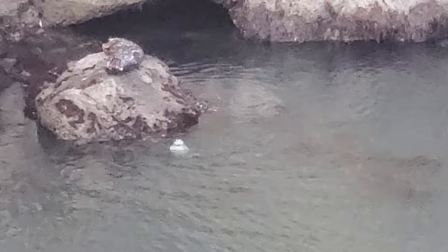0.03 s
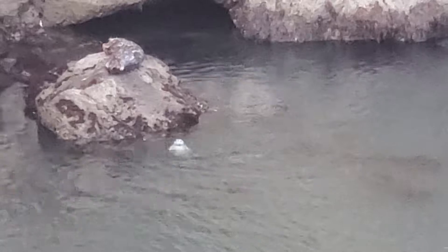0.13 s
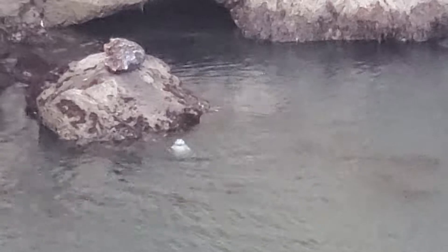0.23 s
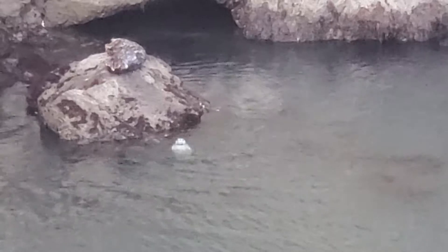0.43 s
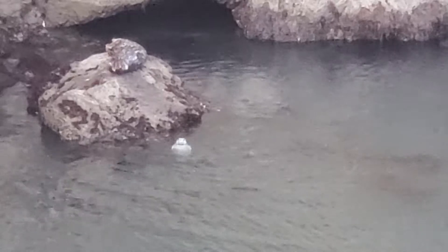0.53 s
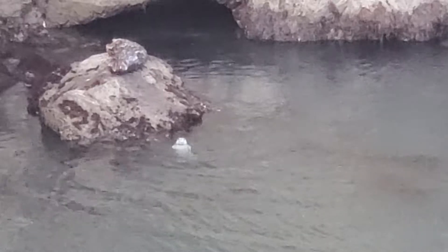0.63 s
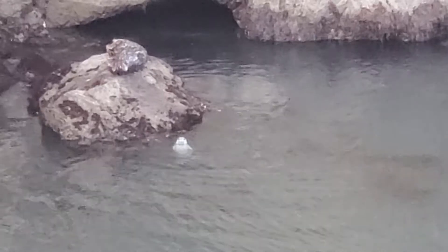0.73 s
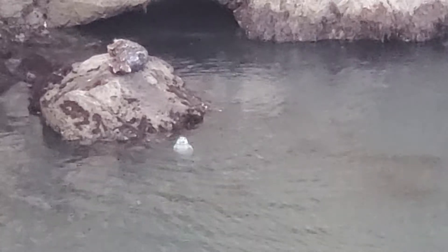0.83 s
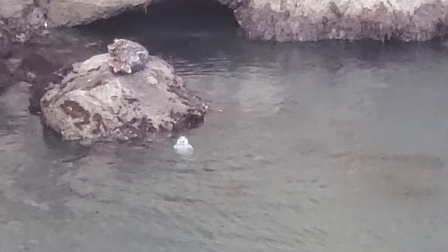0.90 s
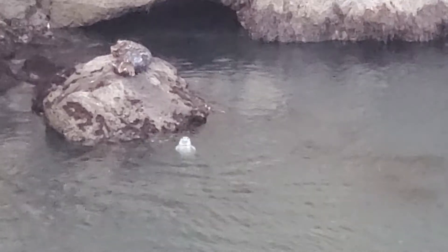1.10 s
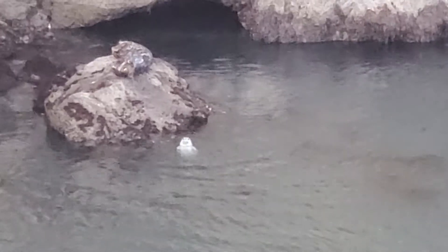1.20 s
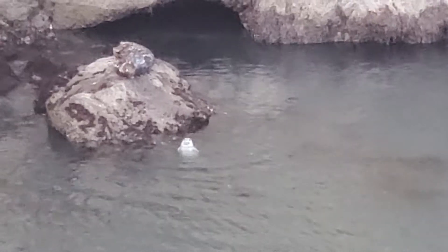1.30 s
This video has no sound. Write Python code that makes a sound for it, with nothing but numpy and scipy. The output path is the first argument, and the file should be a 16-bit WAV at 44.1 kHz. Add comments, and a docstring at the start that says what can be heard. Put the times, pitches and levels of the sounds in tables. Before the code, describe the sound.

Wind thumps and rumbles unevenly on the microphone, with a faint hiss of distant water.

```python
"""A hard gust hits the right port of a two-port microphone above a calm, rocky inlet.
Then the air rumbles and knocks on the left port, with stray puffs and a hollow flutter on the right.
The wind sound is the pressure of passing eddies: large ones rumble, small ones rasp.
A faint, steady hiss of air and distant water lies behind."""
import sys
import numpy as np
from scipy import signal
from scipy.fft import rfft, irfft
from scipy.io import wavfile
from scipy.ndimage import uniform_filter1d

SR = 44100
rng = np.random.default_rng(int(sys.argv[2]) if len(sys.argv) > 2 else 0)


def wav_record(signal):
    """Record a signal, one row per channel, as 16-bit PCM in the file named by sys.argv[1]."""
    frames = np.transpose(np.atleast_2d(signal))
    bounded = np.clip(frames, -1, 1)
    # unit amplitude maps onto the largest positive 16-bit level
    quanta = np.round(bounded * 32767).astype(np.int16)
    wavfile.write(sys.argv[1], SR, quanta)


N = 59535

# Envelopes, before any trim: t/s, level/dB
HISS_ENVELOPE = [(.106, -53), (.25, -57.5), (.3, -60), (.55, -59.5), (.8, -58.5), (.9, -59), (1.2, -59.5),
                 (1.26, -61.5), (1.35, -61.5)]
FLUTTER_ENVELOPE = [(.29, -56.5), (.41, -59), (.46, -50.5), (.545, -56.5), (.63, -48.5), (.67, -55.5),
                    (.72, -41.5), (.745, -58.5), (.805, -41), (.84, -53.5), (.96, -50.5), (1.075, -61.5),
                    (1.125, -47), (1.16, -51), (1.24, -54.5), (1.265, -76.5), (1.328, -46.5), (1.35, -83)]
FLOW_ENVELOPE = [(0.106, -55.7), (0.124, -52), (0.382, -44.5), (0.394, -36), (0.472, -41.5), (0.52, -42),
                 (0.532, -45), (0.556, -38.5), (0.598, -30.9), (0.61, -41.5), (0.64, -24), (0.658, -35.5),
                 (0.676, -34), (0.718, -37.5), (0.73, -27.5), (0.808, -36.5), (0.844, -29.5), (0.892, -51),
                 (0.904, -30), (0.928, -37.5), (0.958, -33.5), (1.006, -28.5), (1.036, -47), (1.072, -36),
                 (1.108, -43), (1.12, -39), (1.144, -34), (1.156, -51), (1.204, -39), (1.228, -59.5),
                 (1.35, -52.5)]
# Gust envelopes, before any trim: t/s, rumble level/dB, rasp level/dB
GUST_ENVELOPES = [(.106, -34.5, -41), (.13, -30, -52), (.16, -19, -63), (.176, -14, -35),
                  (.196, -14.5, -33.5), (.208, -10.5, -23.5), (.226, -16, -33), (.264, -23, -45),
                  (.271, -47.5, -57), (.31, -74, -88.5), (.4, -110, -110)]
# Passing eddies, before trim: t/s, envelope peak level/dB, 1/e half width/s
PUFF_EVENTS = [(0.208, -8.5, 0.0042), (0.392, -39, 0.0048), (0.649, -30, 0.012), (.677, -24.5, 0.003),
               (0.703, -48, 0.042), (0.784, -20.5, 0.0073), (0.843, -44, 0.0095), (0.93, -38.5, 0.018),
               (0.959, -43, 0.0058), (0.987, -42, 0.019), (1.127, -26, 0.01)]
KNOCK_EVENTS = [(0.466, -51.5, 0.036), (0.648, -39.5, 0.014), (0.745, -44.5, 0.052), (0.803, -34, 0.012),
                (0.919, -41, 0.022), (1.115, -41.5, 0.015)]
# Noise spectra, relative density: f/Hz, level/dB
HISS_LEFT_SPECTRUM = [(100, -14.5), (250, 10), (450, 10), (800, 5.5), (1300, 0.5), (2300, -3), (3250, -2.5),
                      (4100, -16), (5500, -28), (8000, -34.5), (11500, -23), (15000, -30.5)]
HISS_RIGHT_SPECTRUM = [(50, -31.5), (130, -20), (250, -8), (450, -17.5), (800, 6.5), (1300, 0.5),
                       (2300, -3), (3200, -5), (4200, -9.5), (5600, -23.5), (7100, -18.5), (8500, -27.5),
                       (15000, -25)]
FLUTTER_SPECTRUM = [(60, -54), (130, -17.5), (250, -15), (320, 1), (440, -0.5), (560, -4), (750, -14),
                    (1100, -21), (2000, -44), (6000, -73)]
PUFF_SPECTRUM = [(40, -22.5), (110, -3), (170, 8), (280, -7), (500, -24), (1500, -52), (8000, -110)]
KNOCK_SPECTRUM = [(70, -42), (130, 2.5), (190, 19.5), (310, 4), (410, 10), (600, -28), (1200, -53),
                  (8000, -105)]
FLOW_RUMBLE_SPECTRUM = [(15, -24), (25, -6), (45, -5), (70, -1), (95, -4.5), (135, -15.5), (200, -26),
                        (400, -46.5), (3000, -90.5)]
FLOW_RASP_SPECTRUM = [(70, -24.5), (130, 5.5), (180, 5.5), (250, -11), (330, -14), (450, -10), (700, -25),
                      (1200, -40), (5000, -73)]
GUST_RUMBLE_SPECTRUM = [(15, -37), (25, -22.5), (45, -6.5), (65, -1.5), (112, 0), (165, -7.5), (240, -14),
                        (330, -19.5), (480, -30), (700, -45.5), (1500, -68), (8000, -115)]
GUST_RASP_SPECTRUM = [(150, -19.5), (310, 4.5), (430, -10), (640, -7), (1000, -22), (1600, -33.5),
                      (3000, -55.5), (9000, -90)]
# Hiss common to both ports: f/Hz, power share/1
HISS_COHERENCE = [(300, .1), (800, .45), (1300, 0.53), (2300, .33), (4000, .1), (8000, .03)]

TIME_S, BINS_HZ = np.arange(N) / SR, np.fft.rfftfreq(N, 1 / SR)


def from_db(db):
    """Decibels to gain."""
    return 10 ** (np.asarray(db) / 20)


def unit_rms(x):
    """Scale to rms 1."""
    return x / np.sqrt(np.mean(x ** 2) + 1e-20)


def per_sample(table, column=1):
    """Table column, interpolated over time."""
    columns = np.transpose(table)
    return np.interp(TIME_S, columns[0], columns[column])


def per_bin(table):
    """Table, interpolated over log frequency."""
    f_hz, value = np.transpose(table)
    return np.interp(np.log(BINS_HZ + 1e-3), np.log(f_hz), value)


def drift(rate_hz):
    """Slow random wander, rms 1."""
    lowpass = signal.butter(2, rate_hz, fs=SR, output="sos")
    return unit_rms(signal.sosfilt(lowpass, rng.standard_normal(2 * N))[N:])


def eddies(spectrum, span_s=0.027, evenness=0.96):
    """Pressure of eddies passing a port at even strength: noise with its swells levelled, rms 1."""
    pressure = unit_rms(irfft(rfft(rng.standard_normal(N)) * from_db(per_bin(spectrum)), N))
    span = int(span_s * SR)
    power = uniform_filter1d(pressure ** 2, span, mode="wrap")
    smooth_power = uniform_filter1d(power, span, mode="wrap")
    return unit_rms(pressure / (smooth_power + 1e-9) ** (evenness / 2))


def swell(at_s, peak_db, half_width_s):
    """Gaussian rise and fall of one passing eddy."""
    return from_db(peak_db) * np.exp(-((TIME_S - at_s) / half_width_s) ** 2)


def shore_hiss(right_lag_s=0.00034):
    """Air and distant water: partly shared by the ports, coloured by each, reaching the left first."""
    shared, left, right = rfft(rng.standard_normal((3, N)))
    share = per_bin(HISS_COHERENCE)
    delay = np.exp(-2j * np.pi * BINS_HZ * right_lag_s)
    left = np.sqrt(share) * shared + np.sqrt(1 - share) * left
    right = np.sqrt(share) * shared * delay + np.sqrt(1 - share) * right
    port_gains = from_db([per_bin(HISS_LEFT_SPECTRUM), per_bin(HISS_RIGHT_SPECTRUM)])
    hiss = unit_rms(irfft(np.array([left, right]) * port_gains, N))
    return from_db(per_sample(HISS_ENVELOPE)) * hiss


def right_flutter(trim_db=0.5):
    """Air grazing the port flutters in a hollow band near 400 Hz."""
    return from_db(trim_db + per_sample(FLUTTER_ENVELOPE)) * eddies(FLUTTER_SPECTRUM)


def right_puffs(trim_db=1.8, swing_hz=75.9, turbulence_db=-11):
    """Single eddies thump the port: push, then suction, with turbulence on top."""
    turbulence = from_db(turbulence_db) * eddies(PUFF_SPECTRUM)
    puffs = np.zeros(N)
    for at_s, peak_db, half_width_s in PUFF_EVENTS:
        swing = np.sin(2 * np.pi * swing_hz * (at_s - TIME_S))
        puffs += swell(at_s, trim_db + peak_db, half_width_s) * (swing + turbulence)
    return puffs


def left_knocks(trim_db=2.4):
    """Tight clusters of small eddies knock on the port."""
    envelope = sum(swell(at_s, trim_db + peak_db, half_width_s)
                   for at_s, peak_db, half_width_s in KNOCK_EVENTS)
    return envelope * eddies(KNOCK_SPECTRUM)


def left_wind(rumble_trim_db=1.02, ref_flow_db=-35, ref_rasp_db=-51, rasp_db_per_db=0.68):
    """Turbulent flow: large eddies rumble; small ones add a patchy rasp that grows with the flow."""
    flow_db = per_sample(FLOW_ENVELOPE)
    patchiness_db = 1.5 * drift(rate_hz=8.7)
    rasp_db = ref_rasp_db + rasp_db_per_db * (flow_db - ref_flow_db) + patchiness_db
    rumble = from_db(rumble_trim_db + flow_db) * eddies(FLOW_RUMBLE_SPECTRUM)
    rasp = from_db(rasp_db) * eddies(FLOW_RASP_SPECTRUM)
    return rumble + rasp


def right_gust(rumble_trim_db=0.95):
    """The hard gust swells, rasps with small eddies at its height and tears off."""
    rumble = from_db(rumble_trim_db + per_sample(GUST_ENVELOPES)) * eddies(GUST_RUMBLE_SPECTRUM)
    rasp = from_db(per_sample(GUST_ENVELOPES, column=2)) * eddies(GUST_RASP_SPECTRUM)
    return rumble + rasp


def scene():
    """Separate wind on each port, over the hiss."""
    left = left_wind() + left_knocks()
    right = right_gust() + right_puffs() + right_flutter()
    return np.array([left, right]) + shore_hiss()


def record(dry, low_cut_hz=30, start_s=0.1055, stopband_hz=17200):
    """Microphone low cut, abrupt start, steep treble cut."""
    highpass = signal.butter(2, low_cut_hz, "high", fs=SR, output="sos")
    lowpass = signal.cheby2(12, 70, stopband_hz, fs=SR, output="sos")
    gated = signal.sosfilt(highpass, dry) * (TIME_S >= start_s)
    return signal.sosfilt(lowpass, gated)


dry = scene()
out = record(dry)
wav_record(out)
```